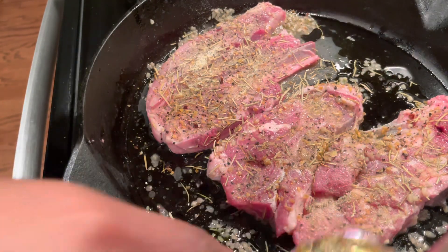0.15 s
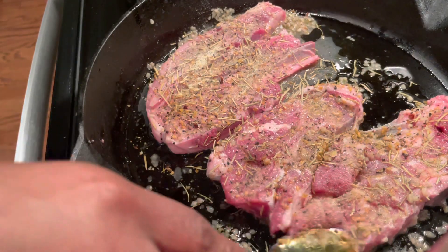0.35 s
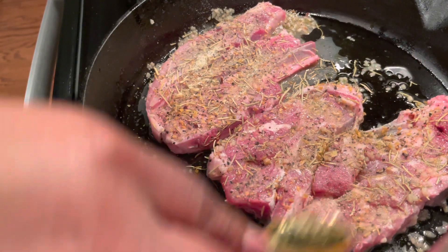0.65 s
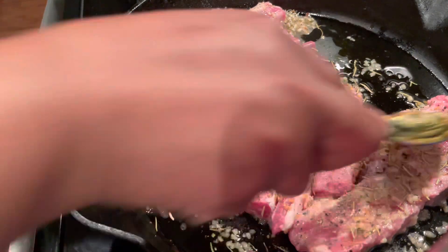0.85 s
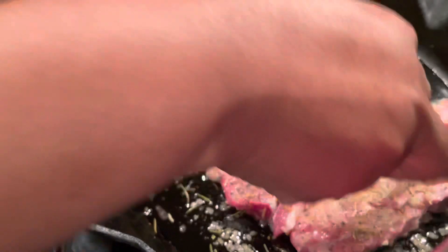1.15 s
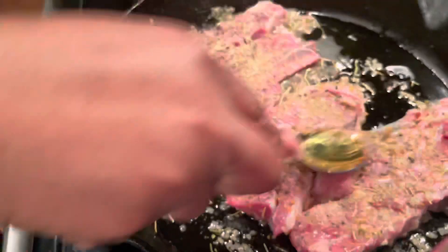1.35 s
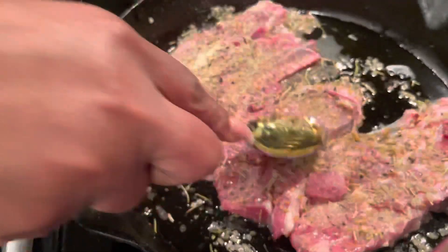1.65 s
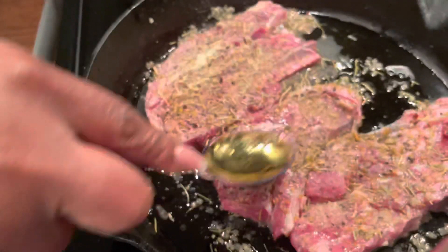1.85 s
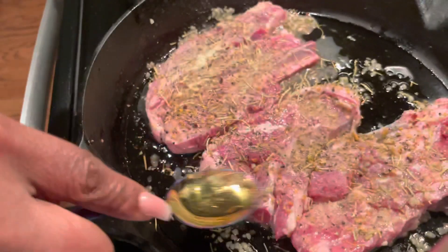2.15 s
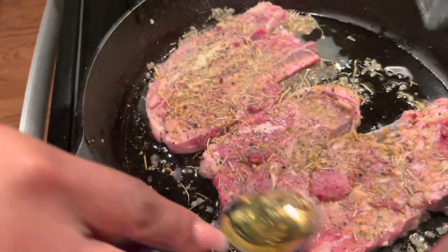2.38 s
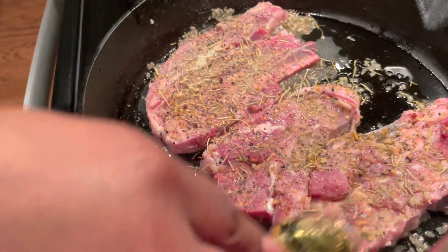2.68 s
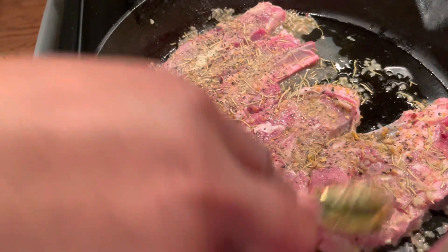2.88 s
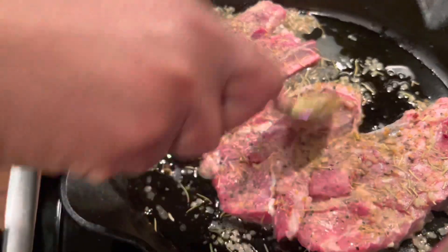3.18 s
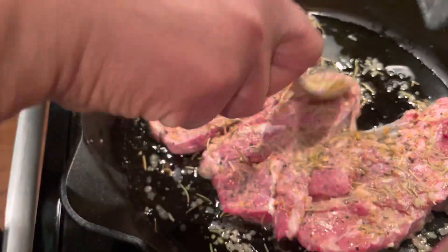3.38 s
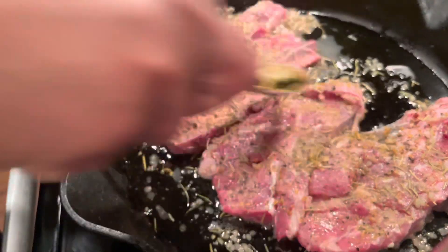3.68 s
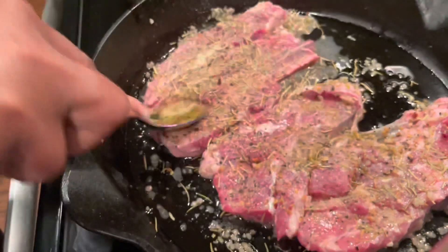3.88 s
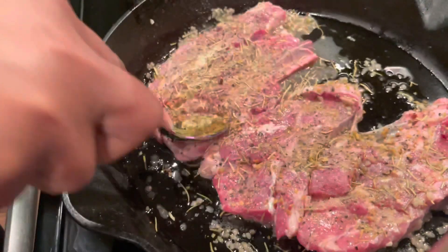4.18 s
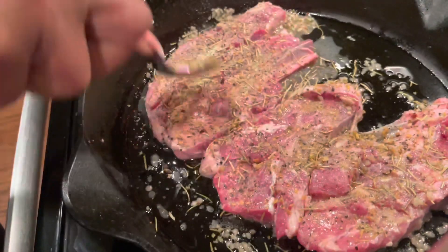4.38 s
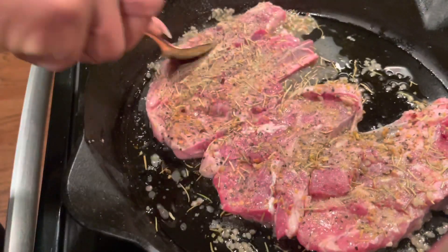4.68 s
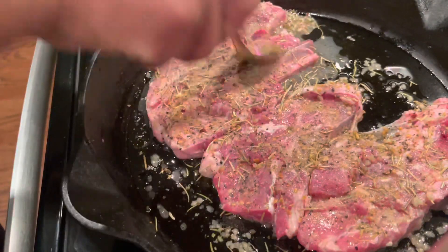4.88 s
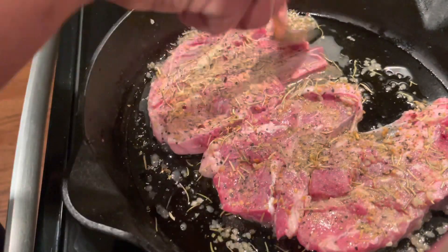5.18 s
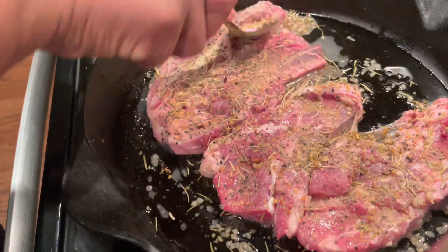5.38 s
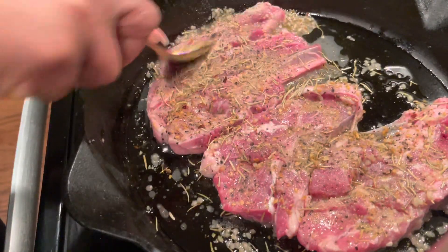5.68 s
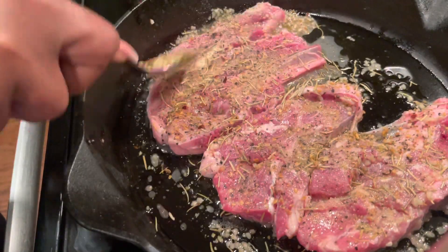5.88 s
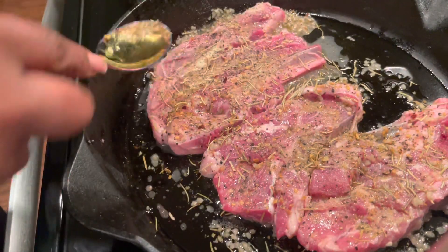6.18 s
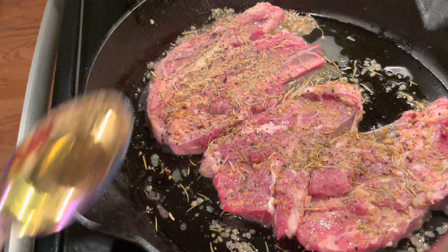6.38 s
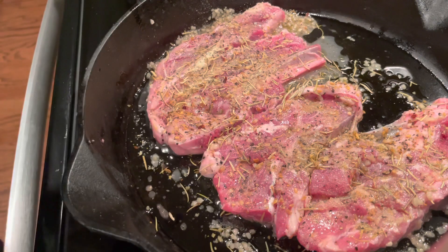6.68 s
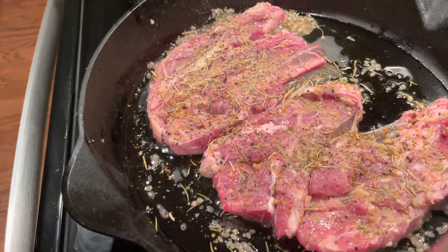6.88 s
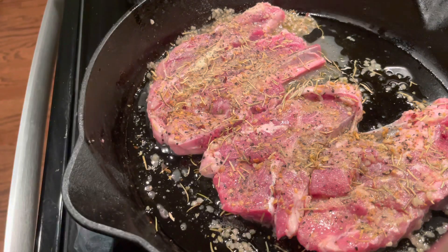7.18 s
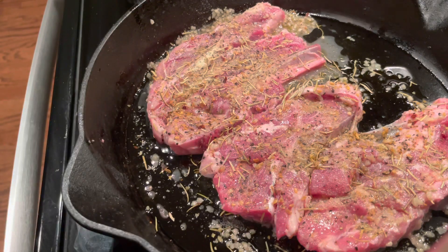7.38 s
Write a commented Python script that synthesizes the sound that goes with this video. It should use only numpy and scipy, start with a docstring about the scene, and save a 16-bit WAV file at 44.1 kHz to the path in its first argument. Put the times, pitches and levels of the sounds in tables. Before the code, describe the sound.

A quiet home kitchen heard close up in stereo, with soft low rumble, thin room noise and very faint fading tones. From the start a metal spoon makes small, irregular bright ticks with short puffs of hiss. A sharper tick comes at 0.85 s, then at about 1.04 s the spoon clangs the pan rim with a gritty crunch and a dull thud. Firm knocks of the heavy pan follow at 1.5 and 1.7 s, and a hollow bump at 2.3 s. Around 3.0 to 3.4 s there is a crunchy rub, a knock and a crisp click. Ticks, light taps and muffled knocks continue to 6 s as the rumble thins. Hollow shuffling bumps come at 6.1 to 6.6 s, then a lull. At 6.9 s a scrape begins, with a loud bright clink at 7.1 s, a small rattle at 7.2 s, and a low hum gliding upward and swelling to the end.

```python
"""Spreading seasoning on meat with a metal spoon in a cast-iron skillet

A metal spoon spreads seasoning over meat in a pan in a home kitchen. Short bright ticks come with bursts of
hiss; grains of noise crunch as the spoon rubs over the seasoning. Damped modes sound where the pan knocks on
its support, the spoon taps the iron, clangs the rim once and, near the end, is laid on a hard top and slides.
Hollow shuffles are bumps and band-passed rubbing noise. Rumble and kitchen noise lie underneath, with
faint fading tones from the start and a low hum that swells at the end.
"""
import sys
import numpy as np
from scipy import signal
from scipy.fft import rfft, irfft, next_fast_len
from scipy.io import wavfile
from scipy.ndimage import uniform_filter1d

SR = 44100
rng = np.random.default_rng(int(sys.argv[2]) if len(sys.argv) > 2 else 0)


def generate_wav(signal):
    """Clip the signal to [-1, 1] and save it as 16-bit WAV at the path in sys.argv[1]."""
    frames = np.transpose(np.atleast_2d(signal))
    scaled = np.clip(frames, -1, 1) * 32767
    pcm = np.round(scaled).astype(np.int16)
    wavfile.write(sys.argv[1], SR, pcm)


N = 332705

# Background levels: t/s, rumble level/dB, kitchen noise level/dB
BACKGROUND_LEVELS = [(0, -53.5, -63.5), (1, -53.5, -69), (2.5, -54, -66), (4.6, -52, -67.5),
                     (5.05, -66.5, -70.5), (5.42, -65.5, -69.5), (5.55, -59.5, -70.5), (5.9, -60, -64),
                     (6.5, -61.5, -61.5), (7.54, -53.5, -63)]
# Relative noise spectra of rumble and kitchen: f/Hz, density level/dB
RUMBLE_SPECTRUM = [(25, -14.5), (43, -8), (81, -6), (151, -13), (199, -4.5), (276, -25.5), (400, -21.5),
                   (520, -64)]
KITCHEN_SPECTRUM = [(150, -25), (250, -1.5), (620, -6.5), (1210, -7), (1550, -11), (1750, -31.5),
                    (3000, -35)]
# Left-right likeness of noise: f/Hz, correlation/1
LIKENESS = [(60, 0.84), (200, 0.81), (500, -0.19), (3000, 0.1), (8000, -0.48), (12500, 0.83)]

# Faint tones from the start: f/Hz, level/dB (before a common offset)
WHINE_TONES = [(872.1, -69), (1098, -73)]
WHINE_T60_S = 7.4
# Hum: t/s, f/Hz, level/dB
HUM_COURSE = [(6.9, 83.9, -60), (7.036, 87, -63.5), (7.54, 97.1, -41.5)]
HUM_OCTAVE_DB = -18

# Hollow shuffles away from the pan:
# t/s, bump level/dB, rubbing level/dB, length/s, hollow pitch f/Hz, grit level against the rubbing/dB
SHUFFLE_STROKES = [(1.537, -56, -53.5, 0.17, 740, -12), (2.277, -37.5, -55, 0.014, 624, -14),
                   (2.354, -27.5, -55.5, 0.059, 626, -41), (6.105, -35.5, -54, 0.012, 697, -5),
                   (6.202, -39, -51, 0.022, 744, -13), (6.293, -50, -53.5, 0.18, 753, -10),
                   (6.393, -45, -39, 0.019, 760, -4), (6.554, -36, -48, 0.047, 760, -9.5),
                   (7.396, -61, -50, 0.01, 720, 1)]
SHUFFLE_ATTACK_S, SHUFFLE_T60_S, BUMP_T60_S = 0.0067, 0.45, 0.022
HOLLOW_WIDTH_HZ, UNDERTONE_DB, BROAD_DB = 200, -6.5, -4
GRIT_TOP_HZ, GRIT_OPENS = 4380, 0.23   # upper edge at a grit level of -65 dB; its rise in dB per dB

# Bright ticks and bursts of hiss, perhaps the spoon on gritty meat:
# t/s, click level/dB, hiss level/dB, hiss length/s
BRIGHT_TICKS = [(0.123, -45, -63.5, 0.03), (.2005, -58, -69, 0.23), (0.3764, -44.5, -73, 0.0046),
                (0.4892, -55, -66, 0.0067), (0.849, -31.5, -45.5, 0.0029), (.8994, -58, -69, 0.054),
                (1.1164, -59, -61, .02), (1.2986, -46.5, -54, 0.015), (1.374, -55, -63.5, 0.035),
                (1.476, -43, -49, 0.0028), (1.6731, -46, -52, 0.0044), (1.8486, -47, -58.5, 0.023),
                (1.897, -45.5, -56, 0.01), (1.998, -49, -63.5, 0.022), (2.1053, -43.5, -86, 0.052),
                (2.112, -46, -86, .03), (2.378, -59, -65, 0.025), (2.535, -47.5, -63.5, 0.0065),
                (2.6953, -56, -51.5, 0.013), (2.8084, -64, -57.5, 0.0085), (3.014, -42, -60, 0.1),
                (3.1217, -57, -84, .01), (3.1942, -41.5, -50.5, 0.013), (3.3125, -44, -62.5, 0.035),
                (3.3841, -28.5, -47.5, 0.013), (3.517, -43.5, -67, .01), (3.772, -46, -51, 0.024),
                (3.842, -53, -58.5, 0.033), (3.89, -40.5, -80, .005), (3.937, -49, -47, 0.011),
                (4.0662, -49.5, -68, 0.054), (4.136, -54, -46.5, 0.0022), (4.252, -63, -58.5, 0.007),
                (4.426, -48, -44, 0.011), (4.54, -43, -66, 0.01), (4.624, -80, -64.5, 0.028),
                (4.737, -54, -63.5, 0.0063), (4.848, -34.5, -52, 0.022), (4.994, -59, -55.5, 0.038),
                (5.125, -47, -69, 0.0031), (5.3, -61, -58.5, 0.042), (5.57, -42.5, -59.5, 0.074),
                (5.7105, -35.5, -50, 0.044), (5.82, -40, -71, 0.0091), (5.896, -49, -60.5, 0.12),
                (6.012, -50, -59.5, 0.022)]
# Bright click of a tick: f/Hz, level/dB, t60/s
CLICK_MODES = [(13480, 5.5, 0.009)]
# Relative noise spectra of the bright hiss and duller wash: f/Hz, density level/dB
HISS_SPECTRUM = [(5000, -14), (8260, -16), (9100, -21.5), (11400, -6.5), (15500, -10), (16500, -2)]
WASH_SPECTRUM = [(1000, 5), (1600, -13), (3500, -6), (5500, -5.5), (6500, 8), (7600, -34), (9200, -17)]
CLICK_T60_S, BURST_T60_S, BURST_BUILD_S = 0.014, 0.13, .012
HISS_DB, WASH_FLOOR_DB = -75, -88.5   # steady floors under the bursts of hiss and wash
WASH_DB = -5   # wash against the hiss
CLICKS_PER_S, CLICKS_DB = 45, 10   # small random clicks in the hiss; greatest height against its level

# Dull knocks of the pan: t/s, level/dB, slap level against the knock/dB
PAN_KNOCKS = [(.354, -48, -29), (0.512, -46, -2.5), (.563, -47.5, -15), (0.929, -47, -4),
              (1.041, -30.5, -19), (1.118, -40.5, -6.5), (1.214, -47, -6), (1.483, -29, -4.5),
              (1.677, -28, 2.5), (1.865, -45.5, -24), (1.924, -45.5, -4.5), (3.017, -31.5, -2.5),
              (3.204, -37, -3), (3.277, -45, -2), (3.392, -41.5, -9), (3.807, -41, -6), (3.909, -44.5, -14),
              (4.01, -43.5, 0), (4.144, -46, 1), (4.233, -42, -5.5), (4.287, -44, -36), (4.4292, -37.5, 6),
              (4.491, -40.5, -5), (4.851, -42.5, 3), (4.942, -50.5, 0.5), (5.898, -35.5, 9.5),
              (5.965, -49, -1), (6.924, -42.5, 9), (7.109, -36, 4)]
# Modes of the iron, the stove top and the slap: f/Hz, level/dB, t60/s
KNOCK_MODES = [(445.6, 5.5, 0.041), (645, -5, 0.042)]
BOOM_MODES = [(64.8, 2.5, 0.22), (111, 12.5, 0.051), (143.3, 16, 0.045), (155, 15.5, 0.058), (201, 6, 0.12)]
SLAP_MODES = [(720, 1, 0.018), (1066, -2.5, 0.016), (1394, -8.5, 0.037)]
BOOM_DB, BOOM_FOLLOWS = -47.5, 0.57   # boom of a -40 dB knock; dB that it rises per dB of knock
TAIL_DB, TAIL_T60_S = -26.5, 0.42   # rustle after the slap, against the slap
SOFT_CONTACT_S = 0.0012   # how long a padded blow presses
PITCH_SPREAD = .07   # each blow lands elsewhere and shifts the damped modes by about this share

# Spoon on the rim: t/s, level/dB
RIM_CLANGS = [(1.038, -22.5)]
# Modes of the pan rim: f/Hz, level/dB, t60/s
RIM_MODES = [(280, -13, .45), (1040, -8, .09), (1098, -21, .6), (1540, -2, .27), (1610, -22, .9),
             (2030, -7, .95), (2299, -15, .2), (1696, -22, .4)]

# Spoon laid on a hard top: t/s, level/dB, chatter length/s, chatter t60/s
SPOON_TOUCHES = [(7.101, -12.5, 0.00083, 0.057), (7.204, -32, 0.019, 0.089)]
# Modes of the spoon: f/Hz, level/dB, t60/s
SPOON_MODES = [(3570, -18, 0.022), (6600, -12, 0.008), (8515, -3.5, 0.03), (10100, -7, 0.006),
               (12200, -28, 0.06), (13260, -18, 0.05), (13600, -14, .015), (14600, -9, 0.012),
               (15460, -13, .018)]
# Spoon sliding over the hard top: t/s, level/dB
SLIDE_LEVELS = [(6.862, -84), (6.875, -55), (6.93, -37.5), (6.975, -45.5), (7.09, -49.5), (7.11, -45.5),
                (7.19, -44), (7.27, -53), (7.4, -67.5), (7.425, -48), (7.54, -60)]
# Relative spectrum of the sliding noise: f/Hz, density level/dB
SLIDE_SPECTRUM = [(300, -2.5), (1810, -2.5), (6800, -2.5), (9280, -9), (13900, -8), (15700, -20),
                  (16500, -41)]
SLIDE_RING_DB = -34   # gain of the two lowest spoon modes driven by the slide

# Spoon rubbing over the seasoned meat: t/s, level/dB, length/s
SEASONING_RUBS = [(0.764, -66.5, 0.15), (1.02, -47, 0.037), (1.466, -57.5, 0.0074), (1.979, -71, 0.18),
                  (3.009, -42.5, 0.032), (5.206, -70.5, 0.041), (5.32, -66, 0.012)]
RUB_ATTACK_S, RUB_T60_S = 0.013, 0.49
RUB_GRAINS_PER_S, RUB_GRAIN_DB = 2500, 4   # grain rate; scale of the random grain heights
# Resonances of the bowl of the spoon: f/Hz, width/Hz, level/dB
BOWL_RESONANCES = [(3500, 350, 9), (5000, 550, 5), (6500, 800, 3)]
BOWL_BED_DB = 9.5   # broad band beneath those resonances
# Spoon edge on the iron: t/s, level/dB
SPOON_TAPS = [(0.2867, -54), (.9028, -47.5), (1.4785, -36.5), (1.674, -36.5), (2.2846, -55), (2.816, -53),
              (3.014, -43), (3.4403, -45), (3.4772, -54.5), (3.7735, -42), (4.141, -38.5), (4.4286, -38),
              (4.8496, -37.5), (5.2117, -66), (5.7104, -32.5), (5.897, -38.5)]
# Modes of a tap: f/Hz, level/dB, t60/s
TAP_MODES = [(2100, -9, .01), (3400, -5, .016), (5050, -8, .011), (6900, -11, .012)]

# Side signal of a near source: f/Hz, level against the mid/dB
PORT_GAP = [(60, -7), (200, -9.5), (500, -6.5), (1400, 3.5), (3500, 1), (8500, 2), (10500, 11.5),
            (12000, 5), (16000, -50)]
ROOM_T60_S, WALL_CUT_HZ, ROOM_DB = 0.34, 2500, -12
LEAN_DB, BASS_CUT_HZ, CUTOFF_HZ = .5, 38, 16850   # lean: left up and right down by this much


def amp(db):
    """The amplitude ratio is ten to the power of level/20."""
    return 10 ** (np.asarray(db) / 20)


def rms_one(x):
    """Normalisation divides by the root of the mean power."""
    return x / np.sqrt(np.mean(x ** 2) + 1e-20)


def in_time(rows, outside=None):
    """Linear interpolation turns the columns of a curve table into sample-by-sample courses."""
    s, *columns = np.transpose(rows)
    return [np.interp(np.arange(N) / SR, s, column, outside, outside) for column in columns]


def at_hz(points, hz):
    """Interpolation on a logarithmic frequency axis reads a spectrum table."""
    table_hz, values = np.array(points).T
    return np.interp(np.log(hz + 1), np.log(table_hz + 1), values)


def band(x, low_hz, high_hz):
    """A Butterworth band-pass transmits a band without ripple."""
    edges = [low_hz, min(high_hz, .45 * SR)]
    return signal.sosfilt(signal.butter(2, edges, "band", fs=SR, output="sos"), x + 1e-18)


def drift(rate):
    """Straight lines between Gaussian points, `rate` per second, form a slow random modulation."""
    points = rng.standard_normal(int(N / SR * rate) + 3)
    return np.interp(np.arange(N) / SR * rate, np.arange(len(points)), points)


def noise(spectrum, patchy_db):
    """Spectral shaping colours noise; the side-to-mid ratio sets the correlation; the level flickers."""
    hz = np.fft.rfftfreq(N, 1 / SR)
    alike = np.clip(at_hz(LIKENESS, hz), -.9, .95)
    mid, side = rfft(rng.standard_normal((2, N))) * amp(at_hz(spectrum, hz))
    mid = irfft(mid, N)
    side = irfft(side * np.sqrt((1 - alike) / (1 + alike)), N)
    stereo = (mid + side * [[1], [-1]]) / np.std(mid)
    return amp(patchy_db * drift(45)) * stereo


def fades(times, db, t60, hold=0.):
    """Exponential decay: the level jumps up at each event, holds and dies away, within half a second."""
    level, t = np.zeros(N), np.arange(SR // 2) / SR
    for s, peak_db, fall, wait in np.broadcast(times, db, t60, hold):
        start = int(s * SR)
        decay = amp(peak_db - 60 * np.maximum(t - wait, 0) / max(fall, .003))
        level[start:start + len(t)] += decay[:N - start]
    return level


def build_up(level, seconds):
    """A moving average makes a sudden onset gradual."""
    return uniform_filter1d(level, size=max(int(seconds * SR), 1))


def puffs(times, db, t60):
    """Decaying envelopes multiply white noise, one puff per event."""
    return fades(times, db, t60) * rng.standard_normal(N)


def ring(force, hz, t60):
    """A damped resonator responds to a unit impulse with a decaying sine that starts at height 1."""
    radius, w = amp(-60 / (t60 * SR)), 2 * np.pi * hz / SR
    return signal.lfilter([0, np.sin(w)], [1, -2 * radius * np.cos(w), radius ** 2], force + 1e-18)


def strike(times, db, modes, spread_db, detune=0.):
    """Modal superposition: each blow excites every mode with its own strength and slight pitch shift."""
    hz, level_db, t60 = np.transpose(modes)[:, :, None]
    t = np.arange(int(2 * t60.max() * SR)) / SR
    out = np.zeros(N + SR * 4)
    signs = (-1.) ** np.arange(len(modes))[:, None]
    chances = rng.standard_normal((len(times), 2, len(modes), 1))
    for s, peak_db, (strength, shift) in zip(times, db, chances):
        decay = amp(peak_db + level_db + spread_db * strength - 60 * t / t60)
        rings = decay * np.sin(2 * np.pi * hz * (1 + detune * shift) * t)
        out[int(s * SR):][:len(t)] += (signs * rings).sum(axis=0)
    return out[:N]


def soft(x):
    """A finite contact time smooths the force: a padded contact spreads the blow over a moment."""
    window = np.hanning(max(int(SOFT_CONTACT_S * SR), 3))
    return signal.lfilter(window / window.sum(), [1], x)


def bowl(x):
    """Resonances of the spoon's bowl, over a broad band, filter the noise."""
    bed = amp(BOWL_BED_DB) * band(x, 900, 3400)
    return bed + sum(amp(db) * band(x, hz - width / 2, hz + width / 2) for hz, width, db in BOWL_RESONANCES)


def ports(x):
    """A phase difference between two microphone ports: the side is the mid turned a quarter cycle."""
    gap = amp(at_hz(PORT_GAP, np.fft.rfftfreq(N, 1 / SR)))
    side = irfft(rfft(x) * -1j * gap, N)
    return x + side * [[1], [-1]]


def room(x):
    """Reverberation by six feedback delays a side, duller on every round, evaluated by frequency."""
    size = next_fast_len(N + SR)
    w = 2 * np.pi * np.fft.rfftfreq(size)
    dull = 1 / (1 + 1j * w * SR / (2 * np.pi * WALL_CUT_HZ))
    spectrum, sides = rfft(x, size), []
    for lags in rng.uniform(.009, .03, (2, 6)) * SR:
        loops = [amp(-60 * lag / SR / ROOM_T60_S) * dull * np.exp(-1j * w * int(lag)) for lag in lags]
        response = sum((-1) ** k * loop / (1 - loop) for k, loop in enumerate(loops))
        sides.append(irfft(spectrum * response, size)[:N])
    return np.array(sides)


def background():
    """Independent noises add in power: rumble and kitchen noise, each with its own course of level."""
    rumble_db, kitchen_db = in_time(BACKGROUND_LEVELS)
    rumble = amp(rumble_db) * noise(RUMBLE_SPECTRUM, patchy_db=3.5)
    return rumble + amp(kitchen_db) * noise(KITCHEN_SPECTRUM, patchy_db=1.2)


def whine():
    """Narrow-band noise is heard as a wavering tone; these faint ones decay exponentially."""
    white, t = rng.standard_normal((2, N)), np.arange(N) / SR
    return sum(amp(db + 5 - 60 * t / WHINE_T60_S) * rms_one(band(white, hz - 8, hz + 8))
               for hz, db in WHINE_TONES)


def hum():
    """Phase is the integral of frequency: a gliding low tone and its octave swell at the end."""
    phase = 2 * np.pi * np.cumsum(in_time(HUM_COURSE)[0]) / SR
    tone = np.sin(phase) + amp(HUM_OCTAVE_DB) * np.sin(2 * phase)
    return amp(in_time(HUM_COURSE, -120)[1]) * np.sqrt(2) * tone


def shuffle():
    """Friction noise excites a hollow body after a bump; the grit above it brightens with its level."""
    white, out = rng.standard_normal((2, N + SR)), np.zeros((2, N + SR))
    lumps, t = amp(1.5 * drift(60)), np.arange(SR // 2) / SR
    for s, bump_db, db, length, hz, grit_db in SHUFFLE_STROKES:
        span = slice(int(s * SR), int(s * SR) + len(t))
        rub = white[:, span]
        hollow = rms_one(band(rub, hz - HOLLOW_WIDTH_HZ / 2, hz + HOLLOW_WIDTH_HZ / 2))
        undertone = amp(UNDERTONE_DB) * rms_one(band(rub, 244, 386))
        broad = amp(BROAD_DB) * rms_one(band(rub, 353, 980))
        top_hz = np.clip(GRIT_TOP_HZ * amp(GRIT_OPENS * (db + grit_db + 65)), 2600, 12000)
        grit = amp(grit_db) * rms_one(band(band(rub, 560, top_hz / 2), 340, top_hz))
        attack = np.minimum(t / SHUFFLE_ATTACK_S, 1)
        stroke = attack * amp(db - 60 * np.maximum(t - length, 0) / SHUFFLE_T60_S)
        bump = soft(ring(amp(bump_db) * (t == 0), hz, BUMP_T60_S))
        out[:, span] += stroke * (hollow + undertone + broad + grit) + bump
    return out[:, :N] * lumps


def ticks():
    """Modal and noise excitation: short bright clicks, each with a burst of hiss and a duller wash."""
    s, db, hiss_db, length = np.transpose(BRIGHT_TICKS)
    click = strike(s, db, CLICK_MODES, spread_db=1.5, detune=PITCH_SPREAD)
    click = click + band(puffs(s, db, CLICK_T60_S), 9500, 16500)
    grain = amp(2.5 * drift(120) + 3 * drift(700))
    impulses = (rng.random(N) < CLICKS_PER_S / SR) * amp(CLICKS_DB) * rng.random(N)
    small_clicks = signal.lfilter([1], [1, -amp(-60 / (CLICK_T60_S * SR))], impulses)
    # the hiss builds over a few ms
    swell = build_up(fades(s + BURST_BUILD_S / 4, hiss_db, BURST_T60_S, hold=length), BURST_BUILD_S)
    hiss = (swell * (grain + small_clicks) + amp(HISS_DB)) * noise(HISS_SPECTRUM, patchy_db=2.5)
    wash_level = amp(WASH_DB) * swell * grain + amp(WASH_FLOOR_DB)
    wash = wash_level * rms_one(bowl(noise(WASH_SPECTRUM, patchy_db=2)))
    return click + hiss + wash


def clang():
    """Free vibration of the rim sounds with the noisy crack of contact."""
    s, db = np.transpose(RIM_CLANGS)
    crack = puffs(s, db + 5, .055) * amp(4 * drift(500))
    return strike(s, db - 6, RIM_MODES, spread_db=0.) + band(band(crack, 900, 4500), 600, 5000)


def clinks():
    """Repeated impact: a first contact and a dense chatter of small ones excite the spoon's modes."""
    s, db, length, t60 = np.transpose(SPOON_TOUCHES)
    chatter = fades(s, db, t60, hold=length)
    rattling = sum(amp(level_db - 17.5) * ring(chatter * rng.standard_normal(N), hz, fall)
                   for hz, level_db, fall in SPOON_MODES)
    return rattling + strike(s, db, SPOON_MODES, spread_db=1.5)


def slide():
    """Sliding friction is a broad-band force; the spoon's two lowest modes sing in it."""
    rub = noise(SLIDE_SPECTRUM, patchy_db=2)
    sung = sum(ring(rub, hz, t60) for hz, _, t60 in SPOON_MODES[:2])
    level_db = in_time(SLIDE_LEVELS, -120)[0] + 2.4 * drift(90)
    return amp(level_db) * (rub + amp(SLIDE_RING_DB) * sung)


def knocks():
    """Coupled bodies: the iron answers, the stove top booms just after, a slap leaves a rustling tail."""
    s, db, slap_db = np.transpose(PAN_KNOCKS)
    slap_db = db + slap_db
    body = strike(s, db - 2, KNOCK_MODES, spread_db=1.5, detune=PITCH_SPREAD / 2)
    boom = strike(s + .004, BOOM_DB + BOOM_FOLLOWS * (db + 40), BOOM_MODES, spread_db=2.5)
    slap = strike(s - .002, slap_db, SLAP_MODES, spread_db=3.0, detune=PITCH_SPREAD)
    rustle = puffs(s, slap_db + TAIL_DB, TAIL_T60_S)
    tail = band(band(rustle, 800, 7000), 600, 5500) * amp(2 * drift(90))
    return soft(body + boom) + band(slap + tail, 472, 8100)


def rubs():
    """A dense random train of impulses: grains of seasoning crunch under the bowl."""
    s, db, length = np.transpose(SEASONING_RUBS)
    strokes = build_up(fades(s + RUB_ATTACK_S / 2, db, RUB_T60_S, hold=length), RUB_ATTACK_S)
    present = rng.random((2, N)) < RUB_GRAINS_PER_S / SR
    height = amp(RUB_GRAIN_DB * np.minimum(rng.exponential(1, (2, N)), 3))
    grains = present * height * rng.choice([-1, 1], (2, N))
    return strokes * amp(2.25 * drift(70)) * rms_one(bowl(grains))


def taps():
    """Impulsive excitation: a hard point contact rings the bowl for a moment."""
    s, db = np.transpose(SPOON_TAPS)
    return strike(s, db, TAP_MODES, spread_db=3.5, detune=PITCH_SPREAD)


def scene():
    """Superposition: near blows, through ports and room, add to all other layers."""
    far = background() + whine() + hum() + shuffle()
    near = clang() + clinks() + knocks() + taps()
    return far + ticks() + slide() + rubs() + ports(near) + amp(ROOM_DB) * room(near)


def record(dry):
    """Linear filtering cuts deep bass and the top; unequal gains make the left a little louder."""
    leaning = dry * amp([[LEAN_DB], [-LEAN_DB]])
    bass_cut = signal.lfilter(*signal.butter(2, BASS_CUT_HZ, "high", fs=SR), leaning)
    return signal.sosfilt(signal.cheby2(14, 70, CUTOFF_HZ, fs=SR, output="sos"), bass_cut)


dry = scene()
out = record(dry)
generate_wav(out)
```